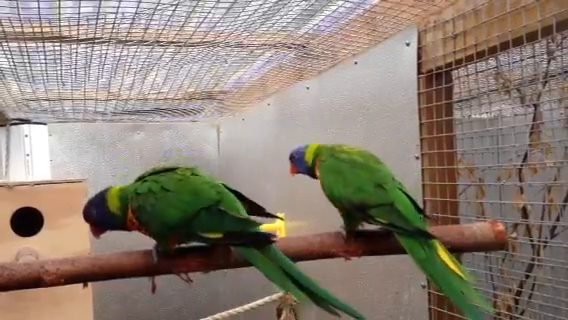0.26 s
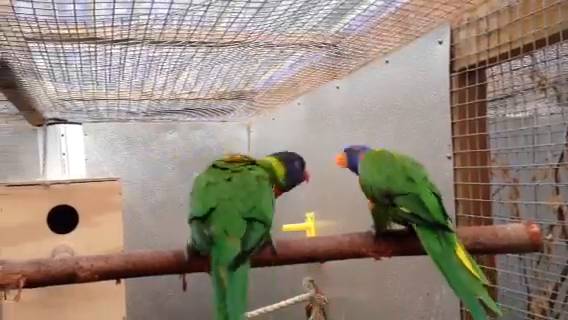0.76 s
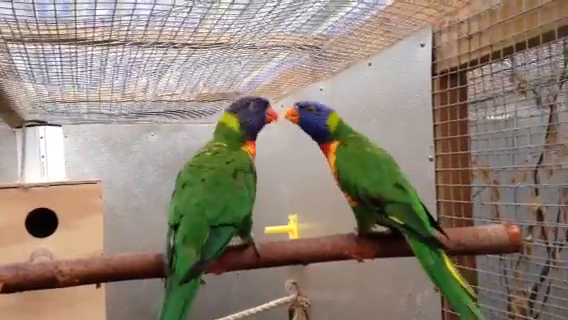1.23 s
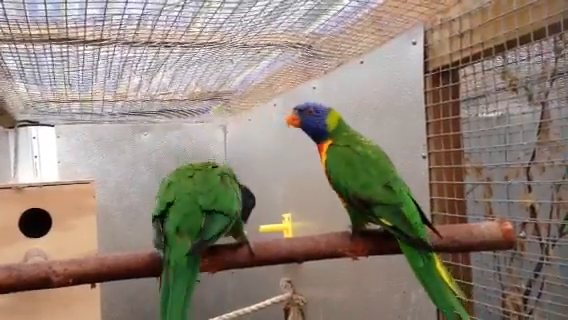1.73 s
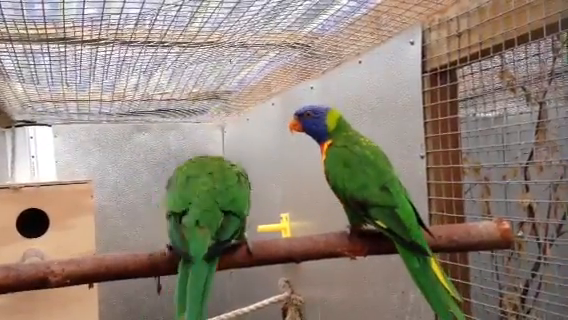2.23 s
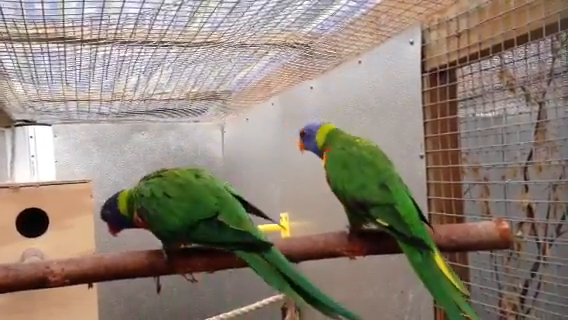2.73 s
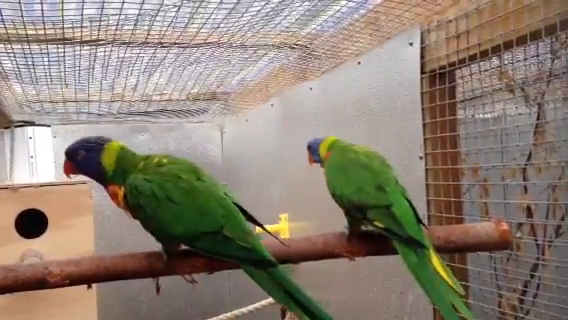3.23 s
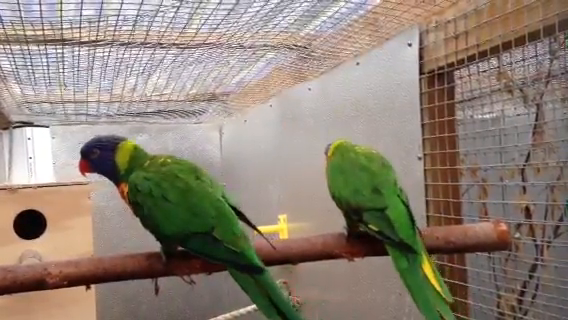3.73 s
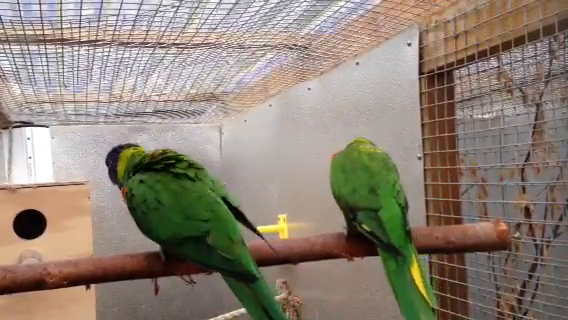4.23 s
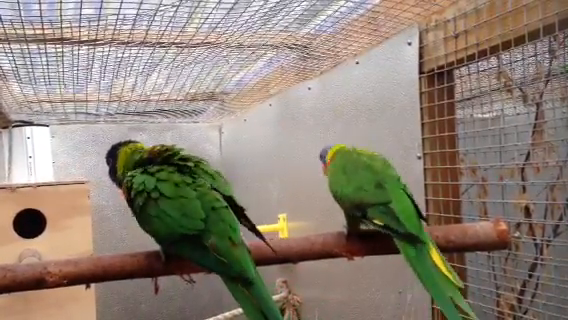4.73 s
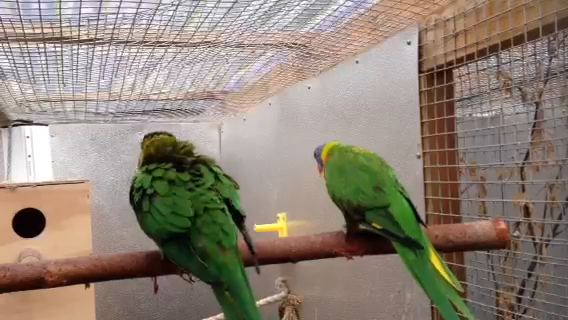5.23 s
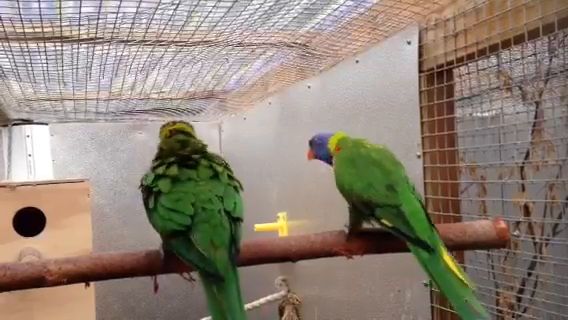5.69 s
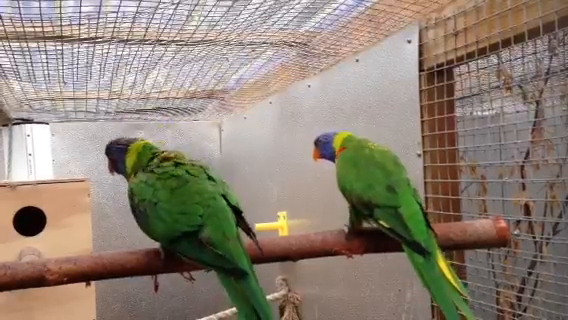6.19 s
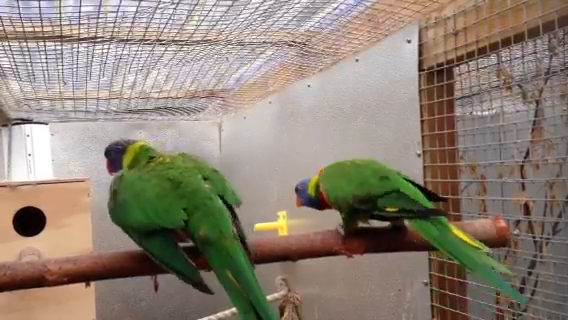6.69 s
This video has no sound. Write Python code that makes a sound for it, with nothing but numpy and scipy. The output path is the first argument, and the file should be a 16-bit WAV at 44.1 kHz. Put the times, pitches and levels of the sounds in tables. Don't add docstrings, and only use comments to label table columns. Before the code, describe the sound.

Inside a small metal-walled aviary, claws tick and scrabble over light rustle and hiss, with beak taps on wood around 0.1-0.4 s and tiny low mutters near 0.2 s. A rough squawk at 0.75 s leads to a growling squabble from 0.9 to 1.2 s. Foot knocks and ticks continue while a faint, hoarse cockerel crows far away from about 2 to 3.8 s. Soft chatter comes at 2.4-2.6 and 3.1-3.2 s, then a shrill layered screech at 3.4-3.6 s with a feather shake. Short whistles and chirps dot 4.1-4.8 s; bright pipes rise and fall at 4.9-5.0 s. A neighbouring bird squeals at 5.5 s. The loudest shriek bursts out at 5.8-5.9 s, leaping upward, followed by a nasal honk at 6.4 s, a piercing neighbour's call at 6.55 s and quick whistles near 6.9 s. Reflections are brief and bright; the microphone sounds thin.

```python
import sys
import numpy as np
from scipy import signal
from scipy.io import wavfile

SR = 44100
rng = np.random.default_rng(int(sys.argv[2]) if len(sys.argv) > 2 else 0)


def invert_db(level):
    return 10 ** (np.asarray(level, dtype=float) / 20)


def master_out(mix):
    frames = np.transpose(np.atleast_2d(mix))
    ceiling = np.clip(frames, -1, 1)
    pcm = np.round(ceiling * 32767).astype(np.int16)
    wavfile.write(sys.argv[1], SR, pcm)


N = 306495

# frequency in Hz, level in dB.
BEAK_HALF_SHUT = [(700, 6), (1500, 6), (2400, -13.5), (3200, 2), (4600, -1), (6500, -1.5), (9500, -1),
                  (15000, -27)]
BEAK_OPEN = [(700, -2), (1200, 11.5), (2000, 1.5), (3200, 1), (5000, 1), (6000, -6), (6800, -6.5),
             (8000, -7), (9300, -3.5), (10600, -14.5), (15000, -23)]
BEAK_SOFT = [(900, 4.5), (1550, 4.5), (2200, -11), (3100, 1), (4600, 4.5), (6300, -7.5), (9500, -7),
             (15000, -42)]
BEAK_WIDE_OPEN = [(2400, -1), (3200, 1), (4000, 1.5), (5000, 0.5), (6500, -6), (8000, -5.5), (12000, -6),
                  (15000, -34)]
CROW_THROAT = [(500, 4), (800, -4), (1300, -23), (2100, 2), (3000, -20)]

# share of the length to the peak, rise to it in dB, sag after it in dB,
# loudest harmonic at start and at end, fall above it in dB per octave at start and at end.
MUTTER_FADING, MUTTER_SWELLING = (0.14, 5.3, 13, 2, 1.3, 10, 6.5), (0.79, 5.7, 2.1, 1.9, 2.44, 9.9, 9.4)
CHIP, HELD = (0.05, 3, 9.5, -1, 1.5, 4, 8.5), (0.41, 0.87, 3, 1.14, 1.15, 11, 10)
HOOK, UPSTROKE = (-1.2, 0.5, 5, 2, 2, 33, 42), (-4, 12, 2, 2, 1.2, 16, 8.5)
OPEN_HELD = (.5, 2, 1, 1.66, 1.56, 13, 5.5)
SQUAWK_ARCHED, SQUAWK_HELD = (0.71, 2.2, 12, 1, 0.83, 6, 7), (0.44, 0.99, 1, 1.03, 0.69, 7.7, 7.8)
SQUAWK_SWELLING = (4, 13, -5, 1, 0, 21, 10)
SCREECH_FADING, SCREECH_SWELLING = (-1.2, -16, 6.5, 0.72, 1.5, 1.5, 19), (12, 4, -10, 1.7, 0.2, 7, 4.5)
SCREECH_OPEN = (-1.5, 0, 8.5, 1.36, 1.5, 5.5, 14)
FAR_FADING, FAR_HELD = (0.3, -7, 7, 1.5, 0.5, 1, 13), (0.49, 1, 0.93, 1.18, 1.22, 6.6, 15)
FAR_DULL, FAR_OPEN = (0.81, 2.6, 2.6, 1.4, 1.36, 29, 31), (0.45, 4, 19, 2, 1.6, 9, 9)

MUTTERS = { MUTTER_FADING: [(.198, 0.044, 795, 706, -41.5), (.262, 0.038, 768, 791, -38)],
           MUTTER_SWELLING: [(2.365, 0.076, 704, 737, -44.5), (2.445, 0.025, 764, 786, -40.5)]}
WHISTLES = { CHIP: [(4.19, 0.018, 1745, 1618, -31.5), (4.765, 0.015, 2034, 2067, -40),
            (6.856, 0.015, 1590, 1890, -32.5)], OPEN_HELD: [(3.372, 0.028, 2438, 2390, -35)],
            HELD: [(4.116, 0.022, 2314, 2346, -32.5), (4.69, 0.013, 2400, 2210, -53),
            (5.466, 0.026, 2290, 2580, -48), (5.637, 0.0076, 1950, 2170, -42.5)],
            HOOK: [(4.144, 0.012, 2055, 1817, -33), (4.157, 0.0089, 1780, 2080, -35.5)],
            UPSTROKE: [(6.895, 0.011, 1754, 1954, -33.5), (6.938, 0.012, 1960, 1850, -27.5)]}
SQUAWKS = { SQUAWK_ARCHED: [(.736, 0.033, 1420, 1460, -37), (5.83, 0.041, 1734, 1564, -46.5)],
           SQUAWK_HELD: [(.778, 0.13, 1500, 1350, -45), (.745, 0.119, 3420, 3800, -52)],
           SQUAWK_SWELLING: [(1.056, 0.0114, 2070, 1950, -32)]}
SCREECHES = { SCREECH_FADING: [(3.445, 0.108, 3030, 2970, -34), (3.452, 0.0665, 3860, 3770, -24.5),
             (3.525, 0.042, 3770, 3820, -28.5), (3.398, 0.052, 5100, 4900, -32),
             (3.52, 0.066, 5700, 5750, -39), (3.57, .045, 4300, 4200, -42)],
             SCREECH_SWELLING: [(3.402, 0.035, 4090, 3190, -28)],
             SCREECH_OPEN: [(3.398, 0.041, 2566, 2450, -39), (3.518, 0.079, 2815, 2812, -29.5)]}
NEIGHBOURS = { FAR_FADING: [(4.472, 0.015, 4600, 3550, -46), (5.504, .035, 4430, 3890, -44),
              (6.136, 0.033, 3810, 3610, -48)], FAR_DULL: [(2.215, 0.043, 1900, 2210, -51.5),
              (2.265, .03, 2400, 2500, -54), (2.3, 0.035, 2250, 2100, -53), (2.59, 0.055, 1986, 2280, -50),
              (2.68, 0.038, 2245, 2120, -47.5), (3.74, 0.12, 2280, 2260, -54.5),
              (6.68, 0.053, 1204, 1180, -70.5)], FAR_HELD: [(4.484, 0.043, 3380, 3220, -49.5),
              (5.497, 0.039, 3900, 4000, -41), (5.487, 0.037, 3330, 3540, -42.5),
              (6.168, 0.023, 3170, 3670, -48), (6.19, 0.0307, 3700, 3000, -49),
              (6.224, 0.029, 1850, 1700, -56), (6.258, 0.024, 1620, 1590, -51.5),
              (6.155, .04, 3800, 2150, -57.5), (6.24, 0.049, 3500, 3200, -56.5)],
              FAR_OPEN: [(5.66, 0.045, 1763, 1726, -49.5), (5.716, 0.013, 1940, 1860, -45)]}

# time in seconds, pitch in Hz, level in dB, loudest harmonic, fall above it in dB per octave.
SHRIEKS = [
    [(5.794, 1197, -36.5, 1.3, 7.5), (5.82, 1176, -21, 3.93, 16), (5.832, 1210, -26.5, 1.7, 2)],
    [(5.838, 1101, -12.5, 3.25, 47), (5.852, 1146, -21, 3.5, 6), (5.868, 1224, -24, 3.9, 6)],
    [(5.868, 2470, -24.5, 0.44, -5), (5.885, 2804, -23.5, 0.86, 1.5), (5.9, 2774, -30.5, 0.97, 25.5)],
]
HONK = [
    [(6.355, 957, -39, 1.5, 31), (6.364, 962, -35, 2, 20), (6.372, 921, -29.5, 3.6, 8.5),
     (6.392, 929.5, -31.5, 1.63, 3.5), (6.415, 943.5, -31.5, 2.5, 4.5), (6.441, 924, -37.5, 1.85, 8)],
    [(6.36, 935, -50, 1, 40), (6.38, 930, -46, 1, 40), (6.44, 932, -48, 1, 40)],
]
PIPING = [
    [(4.917, 2662, -26, 0.97, 23), (4.934, 2673, -24, 1, 7), (4.944, 2624, -32.5, 0.92, 2)],
    [(4.941, 3460, -28, 1, 5), (4.96, 3423, -23, 1, 4.5), (4.973, 3210, -22.5, 0.52, 7)],
    [(4.979, 2540, -29.5, 0.99, 5), (5.0, 2605, -29.5, 0.95, 7.5), (5.03, 2425, -36.5, 0.96, 9.5)],
]
CHIRPS = [
    [(4.298, 1830, -31, 1.7, 3), (4.308, 1950, -30.5, 1.87, 11.5), (4.322, 2033, -36, 1.6, 19)],
    [(.238, 721, -51, 1.7, 16), (.262, 753, -48, 1.9, 14)],
]
SQUABBLE = [
    [(.915, 1740, -32, 1.5, 14), (.945, 1690, -38, 0.8, 9), (.966, 1780, -32.5, 1.1, 11.5)],
    [(.966, 1016, -38, 1.3, 5), (.984, 991, -34.5, 3.5, 9.5), (1.005, 940, -39.5, 1.7, 21)],
    [(1.074, 1218, -32.5, 1, 6.5), (1.1, 1140, -28, 1.8, 2), (1.118, 1020, -31, 2.15, 13.5),
     (1.142, 944, -36.5, 1.9, 1.5)],
    [(1.146, 1760, -25.5, 0.76, 4), (1.165, 1721, -31.5, 0.78, 7.5), (1.192, 1757, -45, 0.61, 12)],
]
CHATTER = [
    [(3.101, 1456, -35, 1, 11), (3.112, 1561, -34.5, 0.84, 6), (3.13, 1540, -40.5, 0.75, 5.5)],
    [(3.171, 1795, -40, 1, 0), (3.182, 1588, -43, 1, 8), (3.19, 1670, -37.5, 1, 4.5)],
    [(3.192, 1480, -41, 1, 4), (3.207, 1543, -32, 0.87, 8), (3.222, 1640, -43.5, 0.75, 4),
     (3.238, 1670, -45, 1, 7)],
    [(2.5, 921, -40, 0.86, 22), (2.515, 1028, -34, 2, 16), (2.535, 1078, -34, 2.05, 16)],
]
PIERCING = [
    [(6.531, 2760, -41, 2.1, 4), (6.545, 2645, -30, 2.04, 9), (6.557, 2598, -28.5, 2.04, 11),
     (6.59, 2615, -38.5, 1.8, 9), (6.62, 2626, -46, 1.6, 8)],
    [(6.549, 3580, -36, 1, 14), (6.56, 3860, -30.5, 0.93, 12), (6.585, 3840, -34.5, 0.86, 14),
     (6.65, 3796, -48, 0.89, 16)],
    [(6.553, 3280, -39, 1, 8), (6.575, 3260, -42, 0.89, 9), (6.62, 3200, -49, 0.87, 12)],
]
SQUEAL = [
    [(5.537, 6200, -37, 0.91, 22), (5.555, 5900, -33.5, 0.97, 22), (5.6, 5900, -47, 0.91, 22)],
    [(5.54, 4900, -35, 1, 12), (5.555, 5160, -35.5, 0.93, 9), (5.61, 5140, -47, 0.88, 10)],
    [(5.542, 5510, -38, 1, 16), (5.556, 5530, -38, 0.88, 16), (5.59, 5470, -50, 0.75, 16)],
]

# time in seconds, peak in dB.
MESH_TICKS = [(0.0746, -40.5), (0.318, -37.5), (0.5383, -40.5), (0.597, -40), (1.8855, -42), (2.604, -49),
              (2.8776, -55), (2.989, -37), (3.0014, -40), (3.31, -55), (4.625, -71), (1.286, -43),
              (1.39, -42.5), (4.535, -38), (4.5781, -36.5)]
# time in seconds, peak in dB.
GRIPS = [(.415, -49), (0.4673, -49), (0.679, -49), (1.5637, -44), (1.688, -51), (2.041, -41),
         (2.641, -40.5), (3.0742, -36.5), (3.14, -46), (3.174, -46), (3.9008, -47.5), (4.795, -48.5),
         (5.3512, -102), (5.41, -53), (1.662, -39.5)]
# time in seconds, peak in dB.
STEPS = [(0.1604, -43), (.2698, -82), (0.437, -34), (0.57, -44), (1.5333, -59), (1.9251, -41), (2.369, -44),
         (3.078, -43), (3.826, -47), (4.128, -42), (4.1903, -40.5), (4.736, -46), (5.149, -68),
         (5.184, -48), (5.309, -47), (6.174, -44)]
MESH_KNOCK_DB, STEP_TICK_DB = -10, -12
# frequency in Hz, width in Hz, level in dB.
PERCH = [(330, 240, -5), (650, 400, -3), (1150, 600, 0), (2300, 1600, -3)]
# time in seconds, peak in dB, ring in Hz.
TAPS = [
    (.0745, -36, 1140),
    (.163, -30, 1100),
    (.166, -37, 400),
    (.317, -36, 1960),
    (.386, -40, 1980),
    (3.074, -34, 1695),
    (4.578, -36, 1840),
    (5.181, -42, 1180),
]
TAP_T60_S = .04

# time in seconds, pitch in Hz, level in dB.
CROW = [
    [(2.05, 535, -62.5), (2.25, 600, -58), (2.42, 649, -49.5), (2.6, 640, -52.5), (2.8, 652, -55.5),
     (3.0, 692.5, -53), (3.2, 600, -75)],
    [(3.36, 752, -53), (3.45, 640, -56), (3.54, 690, -54.5), (3.64, 650, -58), (3.74, 570, -55.5),
     (3.85, 620, -69)],
]
CROW_WAVER = .032

# time in seconds, level in dB.
BUSTLE = [(0, -50.5), (.7, -52.5), (.95, -50.5), (1.25, -50), (2.1, -54.5), (2.9, -51), (3.1, -47.5),
          (3.3, -53), (3.8, -56), (4.0, -59), (4.3, -59), (4.4, -52.5), (4.75, -58), (5.2, -61),
          (5.6, -58.5), (6.08, -64), (6.2, -64), (6.95, -69)]
# start in seconds, length in seconds, peak in dB.
WING_BEATS = [
    (2.9, 0.49, -61),
]
# start in seconds, length in seconds, peak in dB.
RUFFLES = [
    (2.2, .15, -63.5),
    (3.33, 0.23, -45),
    (4.31, 0.18, -59.5),
    (5.45, 0.17, -50),
    (6.12, 0.23, -64),
    (6.58, 0.14, -62),
]
# frequency in Hz, level in dB per Hz.
AIR_COLOUR = [(18, -63), (30, -25), (64, -23), (168, 1), (476, 3), (587, 3), (1220, 0), (1350, 23.5),
              (1750, -11), (3640, -8.5), (3940, -12.5), (13800, -23), (15300, -26)]
RUMBLE_DB, HISS_DB = -59, -67
RUMBLE_FOLLOWS, HISS_FOLLOWS = 0.73, 0.37
RUMBLE_LUMPS_DB, RUFFLE_TOP_HZ = 3, 10600

# frequency in Hz, time to die by 60 dB in seconds.
WALLS = [(300, 0.09), (1500, 0.19), (4000, 0.15), (8000, 0.2), (14000, 0.18)]
WET_DB, CHATTER_WET_DB = -4, -11


def parrots():
    shrieks = calls(SHRIEKS, BEAK_OPEN, jitter=.022, flutter_db=2.5, rasp=.2, breath_db=-23)
    honk = calls(HONK, BEAK_OPEN, jitter=.013, flutter_db=2.5, rasp=.17, breath_db=-21)
    pipes = calls(PIPING + CHIRPS, BEAK_OPEN, jitter=.013, flutter_db=2, rasp=.13, breath_db=-32)
    whistles = calls(shaped(WHISTLES), BEAK_OPEN, jitter=.017, flutter_db=3, rasp=.17, breath_db=-26)
    squawks = calls(shaped(SQUAWKS) + SQUABBLE, BEAK_HALF_SHUT,
                    jitter=.065, flutter_db=3, rasp=.55, breath_db=-14, throb_db=3.5)
    screeches = calls(shaped(SCREECHES), BEAK_WIDE_OPEN, jitter=.044, flutter_db=2, rasp=.45, breath_db=-22)
    return shrieks + honk + pipes + whistles + squawks + screeches


def close_chatter():
    chatter = calls(CHATTER, BEAK_SOFT, jitter=.018, flutter_db=2.5, rasp=.25, breath_db=-24)
    mutters = calls(shaped(MUTTERS), BEAK_SOFT, jitter=.022, flutter_db=4, rasp=.3, breath_db=-24, odd_db=-5)
    return chatter + mutters


def calls(notes, throat, **voice):
    out = np.zeros(N)
    for rows in notes:
        at, sound = note(rows, throat, **voice)
        lowest_hz = .8 * np.min(rows, axis=0)[1]
        cut = signal.butter(6, lowest_hz, "high", fs=SR, output="sos")
        out[at] += signal.sosfilt(cut, sound)
    return out


def shaped(notes_by_shape):
    out = []
    for (peak, rise_db, sag_db, *beak), notes in notes_by_shape.items():
        share = np.array([0, np.clip(peak, .02, .98), 1])
        loudest = beak[0] + (beak[1] - beak[0]) * share
        fall = beak[2] + (beak[3] - beak[2]) * share
        for s, length, first_hz, last_hz, db in notes:
            pitch = first_hz + (last_hz - first_hz) * share
            level_db = [db - rise_db, db, db - sag_db]
            out.append(np.transpose([s + length * share, pitch, level_db, loudest, fall]))
    return out


def note(rows, throat, jitter, flutter_db, rasp, breath_db, odd_db=0, throb_db=0):
    s, *columns = np.transpose(rows)
    at = np.arange(int(s[0] * SR), int((s[-1] + .008) * SR))
    t, n = at / SR, len(at)
    pitch, level_db, loudest, fall = [np.interp(t, s, c) for c in columns]
    waver = 0.75 * wander(n, 259) + .3 * wander(n, 54.1)
    phase = 2 * np.pi * np.cumsum(pitch * (1 + jitter * waver)) / SR
    out = np.zeros(n)
    for k in range(1, int(15500 / pitch.max()) + 1):
        octaves = np.log2(k / np.clip(loudest, .5, 9))
        shape_db = np.where(octaves > 0, -fall * octaves, 12.96 * octaves)
        shape_db = shape_db + at_hz(throat, k * pitch)
        shape_db += odd_db * (k % 2)
        strength = invert_db(shape_db + flutter_db * wander(n, 110))
        out += strength * np.cos(k * phase + 1.8 * rng.random())
    out *= 1 + rasp * wander(n, 388)
    breath = band(rng.standard_normal(n), 2900, 6100)
    out += invert_db(breath_db) * breath * (1 + np.cos(phase))
    out *= invert_db(throb_db * wander(n, 70))
    attack = np.clip((t - s[0] + .002) / .009, 0, 1) ** 1.5
    release = np.clip(1 - (t - s[-1]) / .008, 0, 1)
    sound = 1.264 * invert_db(level_db) * attack * release * out
    return at[at < N], sound[at < N]


def claws():
    contacts = [(s, db, db + MESH_KNOCK_DB) for s, db in MESH_TICKS]
    contacts += [(s, db, db) for s, db in GRIPS]
    contacts += [(s, db + STEP_TICK_DB, db) for s, db in STEPS]
    s, tick_db, knock_db = np.transpose(contacts)
    at, ticks, knocks = (s * SR).astype(int), np.zeros(N), np.zeros(N)
    ticks[at], knocks[at] = invert_db(tick_db + 4), invert_db(knock_db + 15)
    shuffle_db = np.interp(np.arange(N) / SR, *np.transpose(BUSTLE)) + 4 * np.minimum(rng.exponential(1, N), 2.2)
    shuffle = (rng.random(N) < 45 / SR) * invert_db(shuffle_db)
    ticks += invert_db(-2) * shuffle
    knocks += invert_db(13) * shuffle
    scratch = rng.choice([-1., 1.], N)
    out = band(signal.lfilter([1], [1, -.98], ticks) * scratch, 1200, 7000)
    push = signal.lfilter([1], [1, -.99], knocks) * scratch
    for hz, width_hz, level_db in PERCH:
        out += invert_db(level_db) * band(push, hz - width_hz / 2, hz + width_hz / 2)
    return out


def taps():
    out, t = np.zeros(N + SR), np.arange(SR // 10) / SR
    for s, db, hz in TAPS:
        start = int(s * SR)
        ring = np.sin(2 * np.pi * hz * t) * (1 + .3 * wander(len(t), 500))
        out[start:start + len(t)] += invert_db(db - 60 * t / TAP_T60_S) * band(ring, hz / 2, hz * 4)
    return out[:N]


def aviary(x):
    t = np.arange(SR // 2) / SR
    tail = np.zeros(len(t))
    for hz in 170 * 2. ** np.arange(7):
        octave = band(rng.standard_normal(len(t)), hz / 1.41, hz * 1.41)
        tail += octave * invert_db(-60 * t / at_hz(WALLS, hz))
    tail += invert_db(-24 - 60 * t / .5) * band(rng.standard_normal(len(t)), 2000, 6500)
    tail *= np.clip((t - .003) / 0.00048, 0, 1)
    return signal.fftconvolve(x, tail / np.sqrt(np.sum(tail ** 2)))[:N]


def neighbours():
    plain = calls(shaped(NEIGHBOURS), BEAK_OPEN, jitter=.03, flutter_db=2.5, rasp=.4, breath_db=-24)
    piercing = calls(PIERCING[:1], BEAK_OPEN, jitter=.028, flutter_db=2.5, rasp=.3, breath_db=-22)
    harsh = calls(PIERCING[1:] + SQUEAL, BEAK_OPEN, jitter=.045, flutter_db=3, rasp=.4, breath_db=-22)
    return plain + piercing + harsh


def cockerel():
    out = np.zeros(N)
    for rows in CROW:
        s, hz, db = np.transpose(rows)
        t = np.arange(s[0], s[-1], .001)
        waver = wander(len(t) * 44, 22)[::44]
        pitch = np.interp(t, s, hz) * (1 + CROW_WAVER * waver)
        loudest, fall = np.full(len(t), 1.0), np.full(len(t), 8.3)
        voice = np.transpose([t, pitch, np.interp(t, s, db), loudest, fall])
        at, sound = note(voice, CROW_THROAT, jitter=.075, flutter_db=4, rasp=.4, breath_db=-40)
        out[at] += sound
    return band(band(out, 440, 2800), 440, 4000)


def surroundings():
    bustle_db = np.interp(np.arange(N) / SR, *np.transpose(BUSTLE))
    swing_db = bustle_db - bustle_db.mean()
    rumble = invert_db(RUMBLE_DB + RUMBLE_FOLLOWS * swing_db + RUMBLE_LUMPS_DB * wander(N, 13.1))
    rumble += swells(WING_BEATS)
    levels = rumble, invert_db(bustle_db), invert_db(HISS_DB + HISS_FOLLOWS * swing_db)
    edges, groups = 30 * 2 ** np.arange(0, 9.4, .5), np.zeros((3, N))
    white = rng.standard_normal((2, N))
    rustle = np.minimum(rng.exponential(1, N // 256 + 1), 5).repeat(256)[:N]
    for k, (low, high) in enumerate(zip(edges, edges[1:])):
        patches_db = 1.5 * wander(N // 8 + 1, 125).repeat(8)[:N]
        grain_db = 1.3 * rustle * min(low / 2000, 1)
        gain = invert_db(at_hz(AIR_COLOUR, np.sqrt(low * high)) + patches_db + grain_db)
        group = int(low > 800) + int(low > 4000)
        groups[group] += gain * band(white[k % 2], low, high)
    feathers = swells(RUFFLES) * band(groups[2], 3500, RUFFLE_TOP_HZ) / groups[2].std()
    return feathers + sum(level * g / g.std() for g, level in zip(groups, levels))


def swells(rows):
    t = np.arange(N) / SR
    return sum(invert_db(db) * np.sin(np.pi * np.clip((t - s) / length, 0, 1)) ** 2 for s, length, db in rows)


def at_hz(points, hz):
    points_hz, db = np.transpose(points)
    return np.interp(np.log(hz), np.log(points_hz), db)


def wander(n, rate_hz):
    r = np.exp(-2 * np.pi * rate_hz / SR)
    run_in = int(SR / rate_hz)
    slow = signal.lfilter([1], [1, -2 * r, r * r], rng.standard_normal(n + run_in))[run_in:]
    return slow * np.sqrt((1 - r * r) ** 3 / (1 + r * r))


def band(x, low_hz, high_hz):
    return signal.sosfilt(signal.butter(2, [low_hz, high_hz], "band", fs=SR, output="sos"), x)


def scene():
    close = close_chatter()
    near = parrots() + claws() + taps()
    far = neighbours() + cockerel()
    walls = aviary(invert_db(CHATTER_WET_DB) * close + invert_db(WET_DB) * near + far)
    return (close + near + far + walls + surroundings())[None]


def band_limit(x):
    return signal.sosfilt(signal.butter(12, 15440, fs=SR, output="sos"), x)


def record(dry):
    thin = signal.sosfilt(signal.butter(2, 90, "high", fs=SR, output="sos"), dry)
    thin = signal.sosfilt(signal.cheby2(12, 50, 15780, fs=SR, output="sos"), thin)
    return band_limit(thin)


dry = scene()
out = record(dry)
master_out(out)
```